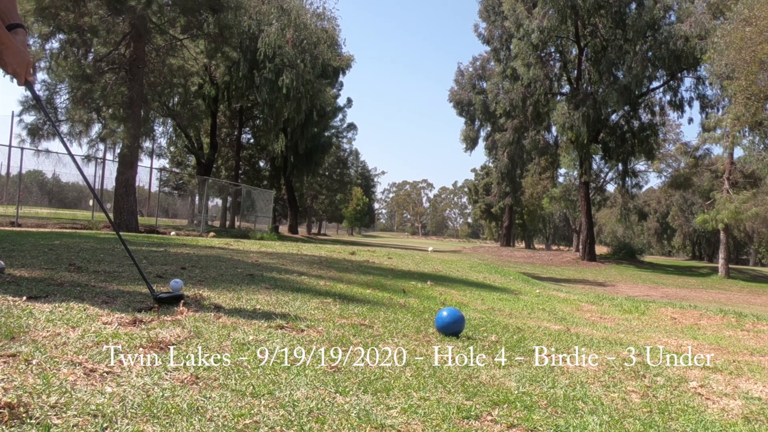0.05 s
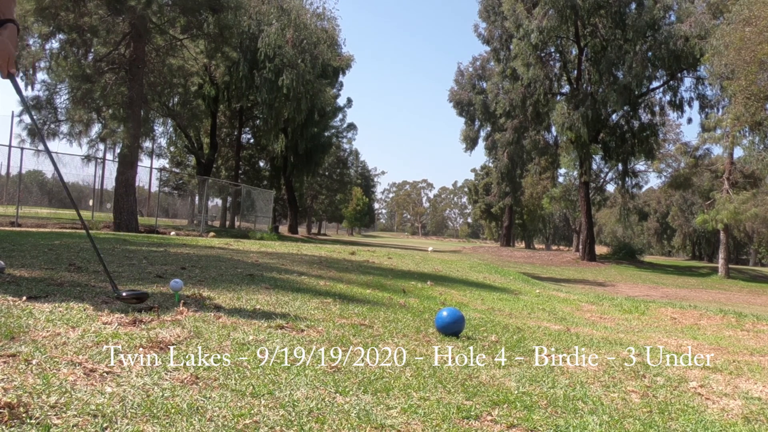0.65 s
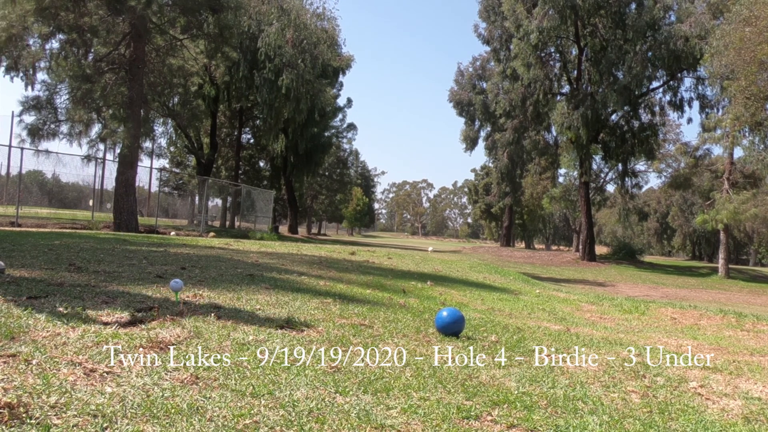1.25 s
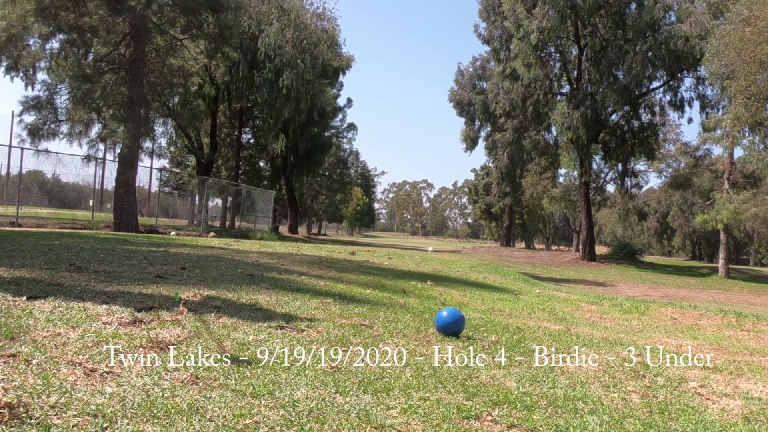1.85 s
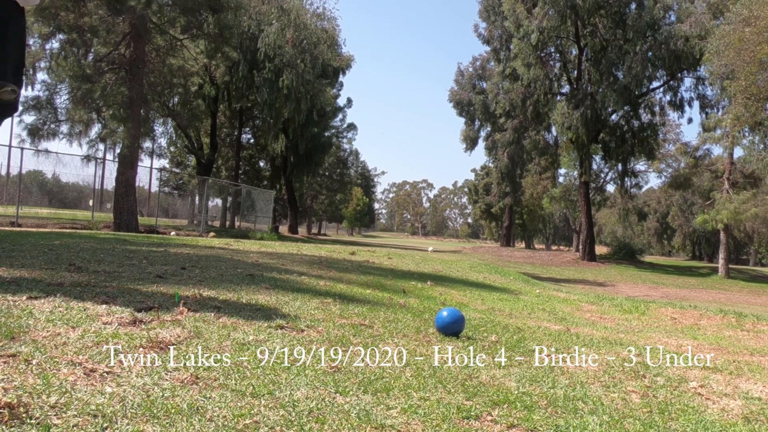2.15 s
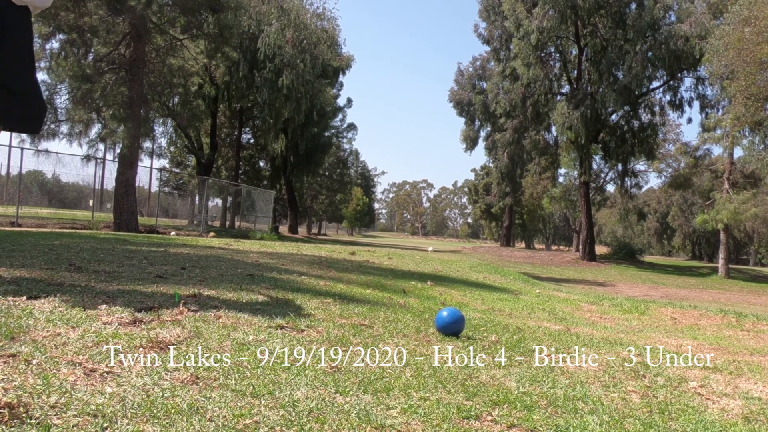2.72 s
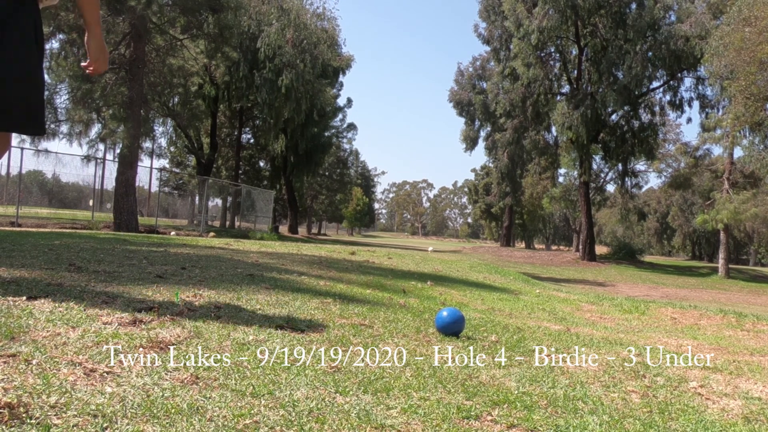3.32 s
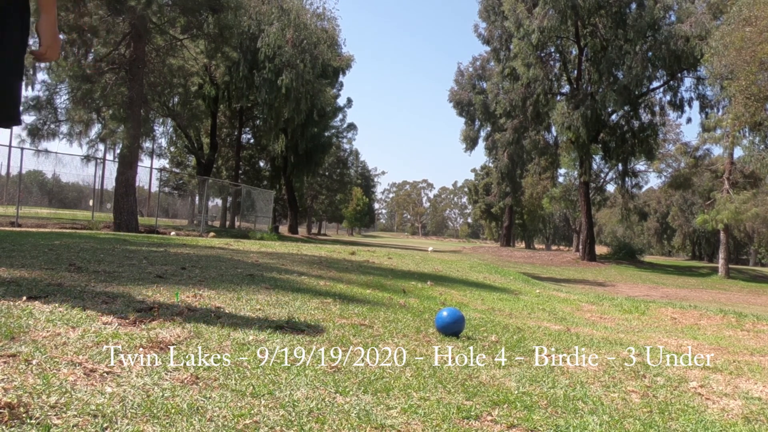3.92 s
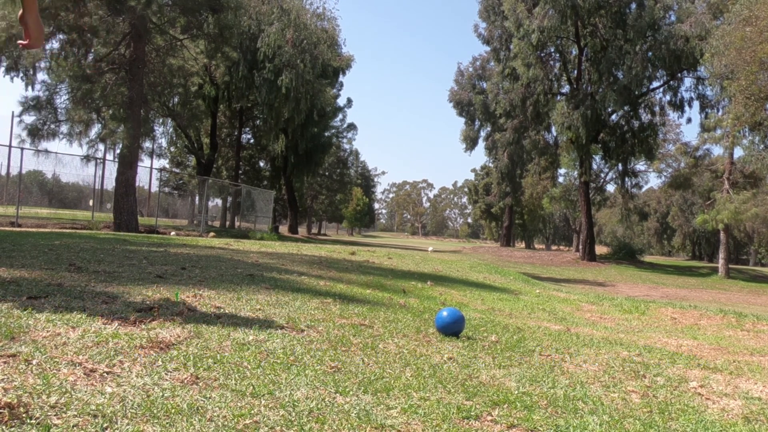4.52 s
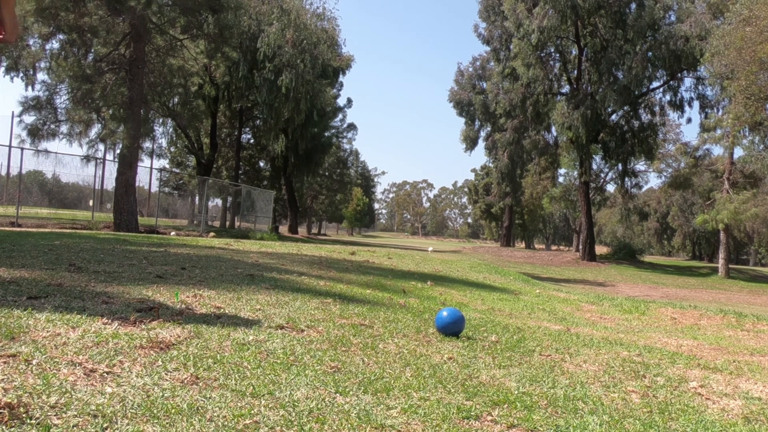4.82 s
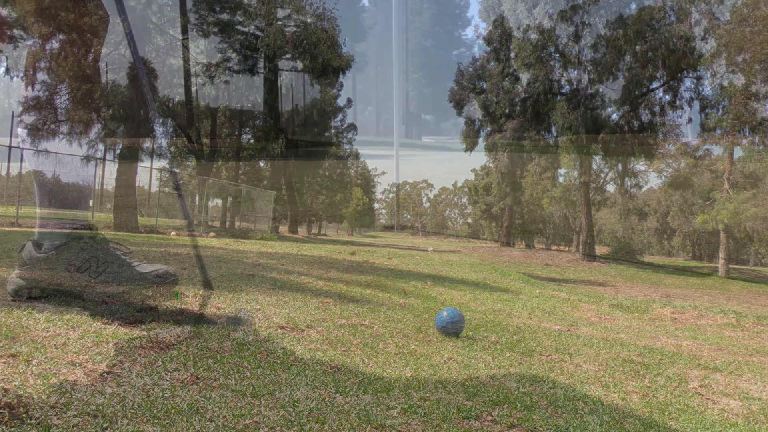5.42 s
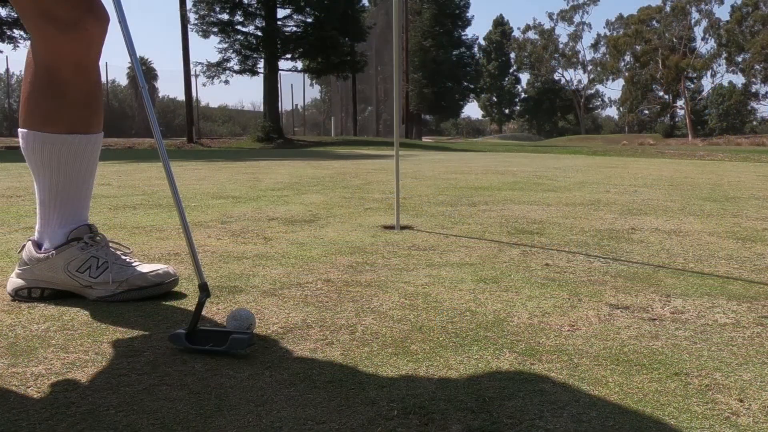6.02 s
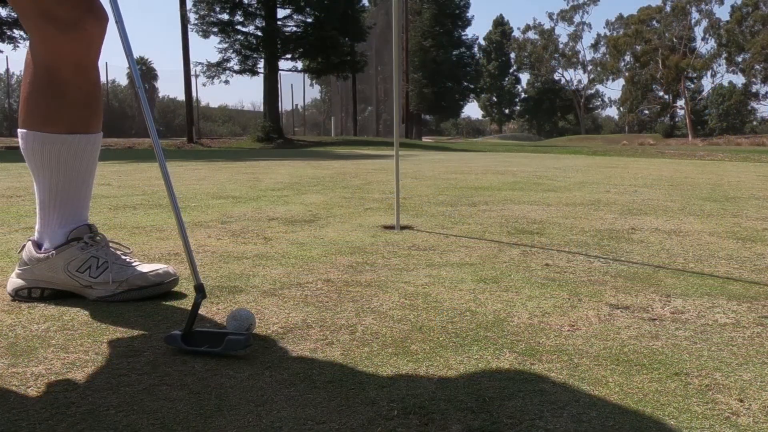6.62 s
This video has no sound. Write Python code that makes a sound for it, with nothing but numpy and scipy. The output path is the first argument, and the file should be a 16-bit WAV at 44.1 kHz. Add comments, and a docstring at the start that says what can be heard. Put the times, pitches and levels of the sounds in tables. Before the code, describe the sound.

Low wind rumble and short bird whistles surround a single loud, sharp golf drive that echoes briefly off the trees.

```python
"""Wind rumbles on the microphone and a small bird repeats two falling whistles and a buzz,
over the hiss of leaves and far traffic on a tree-lined golf course. A few steps away comes a drive:
the club swishes down, its hollow metal head cracks against the ball, and the trees throw the crack
back while a limiter ducks the level. The tee is in mono; at the end the scene changes to the
putting green, in stereo."""
import sys
import numpy as np
from scipy import signal
from scipy.fft import rfft, irfft
from scipy.io import wavfile
from scipy.ndimage import minimum_filter1d

SR = 44100
rng = np.random.default_rng(int(sys.argv[2]) if len(sys.argv) > 2 else 0)


def to_wav(s):
    """Save 16-bit WAV."""
    ch = np.atleast_2d(s).T  # columns
    pcm = np.round(np.clip(ch, -1, 1) * 32767)  # PCM
    wavfile.write(sys.argv[1], SR, pcm.astype(np.int16))


N = 294086
T = np.arange(N) / SR
FREQS = np.maximum(np.arange(N // 2 + 1) * SR / N, 1)
STRIKE_S = 1.7978
# the nearby ground bounces the crack and the birdsong back: delay_s, gain_db
GROUND_BOUNCES = [(.00166, -11.5), (.0042, -23.5)]


def crack(blow_db=20, push_db=-9, contact_s=.00006, push_low_hz=400):
    """The ball leaves with one short push of air and the hollow head rings."""
    # modes of club head and ball: pitch_hz, relative_db, t60_s
    head_modes = [(2680, -10, 0.0047), (3130, -12, .006), (3750, -20, 0.0087), (4167, -8, 0.01066),
                  (4420, -24.5, 0.027), (4630, -14.5, 0.01), (5050, -12.5, 0.01), (5520, -14.5, 0.011),
                  (5820, -13, .029), (5937, -25, .035), (6410, 0, 0.00723), (6230, -31, .05),
                  (6484, -26, 0.049), (6790, -36, .055), (7260, -23, .022), (7580, -25, .03),
                  (8000, -41.5, .0126), (8670, -42, .02), (9620, -44, .012), (10450, -33, 0.004),
                  (12713, -36, .012), (13650, -39, .008), (15600, -45, .0065)]
    blow = (np.arange(N) == round(STRIKE_S * SR)) * 1.
    ringing = sum((-1) ** k * from_db(db) * ring(blow, hz, t60)
                  for k, (hz, db, t60) in enumerate(head_modes))
    contact = signal.lfilter([1], [1, -np.exp(-1 / (contact_s * SR))], blow + 1e-18)
    push = butter(contact, push_low_hz, "high", order=1)
    return from_db(blow_db) * (from_db(push_db) * push + ringing)


def strike(turf_db=-22, turf_t60=0.02, lawn_db=-31, lawn_t60=0.049, grass_low_hz=3800,
           halo_db=-25, halo_t60=0.016, bark_t60=.035, air_hz=7500):
    """The crack bounces off the ground, scatters in turf and lawn, and slaps back from trunks."""
    # distinct echoes from single trunks: arrival_s, gain_db
    trunk_echoes = [(1.862, -53), (1.903, -60), (1.923, -56), (1.992, -57), (2.012, -64), (2.042, -62),
                    (2.15, -68.5)]
    direct = crack()
    treble = butter(direct, grass_low_hz, "high", order=5)  # grass blades scatter only short waves
    halo = from_db(halo_db) * scattered(direct, halo_t60)  # short broadband noise round the crack
    dulled = butter(treble, air_hz, "low", order=5)
    slaps = reflected(dulled, [(s - STRIKE_S, db) for s, db in trunk_echoes])
    trunks = scattered(slaps, bark_t60)
    turf = from_db(turf_db) * scattered(treble, turf_t60)
    lawn = from_db(lawn_db) * scattered(treble, lawn_t60)
    return direct + reflected(treble, GROUND_BOUNCES) + halo + turf + lawn + trunks


def swing():
    """Air rushes round the humming shaft; a bright hiss leads the crack and an airy whistle follows."""
    # swell of the downswing: time_s, level_db
    swish_curve = [(1.62, -86), (1.69, -72), (1.735, -49.5), (1.77, -48.5), (1.795, -44.5), (1.81, -58),
                   (1.86, -88.5)]
    # air round the club: freq_hz, level_db
    swish_colour = [(250, 3), (580, 3.5), (1100, 0), (2000, -5), (3500, -7), (5200, 6), (6700, 1),
                    (8000, -13.5), (10000, -28), (12000, -45.5)]
    # brief burst of hiss just before the crack: time_s, level_db
    hiss_curve = [(1.7855, -53.5), (1.787, -35), (1.790, -44), (1.795, -60)]
    # its bright colour: freq_hz, level_db
    hiss_colour = [(3500, -5), (5000, 0), (8000, -6.5), (10500, -15.5), (11500, -29)]
    # hum of the shaft, rising with its speed: time_s, pitch_hz, level_db
    shaft_glide = [(1.705, 410, -70), (1.73, 488, -58), (1.76, 547, -56), (1.797, 665, -48.5)]
    # rising airy whistle after the strike: time_s, pitch_hz, level_db
    follow_through_glide = [(1.80, 4150, -44), (1.826, 4170, -48), (1.845, 4300, -38), (1.86, 4420, -55),
                            (1.878, 4540, -39), (1.90, 4630, -38.5), (1.93, 4730, -58), (1.97, 4860, -66)]
    swish = envelope(swish_curve) * noise(swish_colour)
    pre_crack_hiss = envelope(hiss_curve) * noise(hiss_colour)
    hum = airy_tone(shaft_glide, spread_hz=25, speed_hz=150)
    follow_through = airy_tone(follow_through_glide, spread_hz=75, speed_hz=350)
    return swish + pre_crack_hiss + hum + follow_through


def tree_echoes(flutter_db=0.5, flutter_hz=70, top_db=-1.5, top_loss_db_per_s=11.5,
                sheen_db=-13, sheen_loss_db_per_s=80):
    """Foliage scatters the crack into overlapping washes, duller the farther they have come."""
    # groups of trees: arrival_s, rise_s, body_level_db, t60_s
    tree_groups = [(1.872, 0.014, -51.5, .28), (1.92, 0.028, -45.5, .66), (2.015, .0092, -44, 0.27),
                   (2.12, .06, -56.5, 1.34)]
    # body of the echo: freq_hz, level_db
    body_colour = [(3000, -17), (3750, -16), (4300, -6.5), (4660, 2), (5100, -2.5), (5500, -11.5),
                   (5900, -8.5)]
    # its bright top: freq_hz, level_db
    top_colour = [(5500, -17), (5820, -5), (6350, -5.5), (6600, 1), (7200, -12), (8100, -20), (10500, -45)]
    # its glassy sheen, which the air soon absorbs: freq_hz, level_db
    sheen_colour = [(8000, 2), (10500, -16), (13000, -15), (14000, -26)]
    power = 0
    for s, rise, db, t60 in tree_groups:
        swell = np.exp(-(np.minimum(T - s, 0) / rise) ** 2)
        fall_db = 60 * np.maximum(T - s, 0) / t60
        power = power + from_db(db - fall_db) ** 2 * swell
    travel_s = np.maximum(T - STRIKE_S, 0)
    top = from_db(top_db - top_loss_db_per_s * travel_s) * noise(top_colour)
    sheen = from_db(sheen_db - sheen_loss_db_per_s * travel_s) * noise(sheen_colour)
    flutter = from_db(flutter_db * wobble(flutter_hz))
    return np.sqrt(power) * flutter * (noise(body_colour) + top + sheen)


def birds(droop_share=0.21, tremble_hz=18, fray_hz=90, break_droop_share=0.15, break_rough_hz=70,
          slur_rough_share=0.29, waver_db=2.24, near_db=-11, near_t60=0.57, far_db=-12, far_t60=1.0):
    """Whistles droop ever faster and fray, then a buzz rasps; twigs and far trees scatter the song."""
    # pairs of pure whistles: start_s, length_s, top_hz, droop_power, peak_db, swell_db,
    # share_before_peak, fade_db
    whistles = [(0.087, 0.089, 6790, 2.9, -42.5, 33, 0.73, 6.5),
                (0.202, 0.081, 6250, 2.6, -43.5, 11, .6, 10),
                (2.576, 0.060, 6620, 2.14, -38.5, 25, 0.63, 7.5),
                (2.680, 0.069, 6110, 1.86, -45.5, 12, 0.14, 1),
                (4.584, 0.088, 6640, 6.5, -45.5, 28, 0.77, 1.5),
                (4.707, 0.063, 6310, 2.1, -44.5, 12.5, 0.69, 1.5)]
    # a second whistle can crack into falling partials: start_s, length_s, fundamental_hz, level_db
    breaks = [(2.738, 0.017, 1870, -62), (4.760, 0.025, 2000, -53)]
    # partials of that break: multiple, relative_db
    break_partials = [(2, 0), (3, 0), (4, -13)]
    # faint slurred chirps: start_s, length_s, first_hz, last_hz, level_db
    chirps = [(0.624, 0.025, 4750, 3860, -55.5), (0.698, 0.039, 4750, 3800, -60.5),
              (3.263, 0.038, 7690, 7130, -72.5), (3.985, 0.029, 7270, 6810, -71),
              (6.03, 0.11, 3230, 3150, -66)]
    song = np.zeros(N)

    def sing(s, hz, level, rough_hz):
        """Add one note, its pitch shaken by rough_hz."""
        at = int(s * SR)
        tremble = rough_hz * rms_one(butter(rng.standard_normal(SR), 600, "low"))[-len(hz):]
        song[at:at + len(hz)] += np.sqrt(2) * level * sine(hz + tremble)

    for s, length, top_hz, droop_power, peak_db, swell_db, peak_share, fade_db in whistles:
        progress = np.linspace(0, 1, int(length * SR))
        db = peak_db + np.interp(progress, [0, peak_share, 1], [-swell_db, 0, -fade_db])
        level = from_db(db) * signal.windows.tukey(len(progress), .2)
        droop = progress ** droop_power
        sing(s, top_hz * (1 - droop_share * droop), level, tremble_hz + fray_hz * droop)
    for s, length, hz, db in breaks:
        progress = np.linspace(0, 1, int(length * SR))
        for multiple, partial_db in break_partials:
            level = from_db(db + partial_db) * np.sin(np.pi * progress)
            sing(s, multiple * hz * (1 - break_droop_share * progress), level, break_rough_hz)
    for s, length, first_hz, last_hz, db in chirps:
        progress = np.linspace(0, 1, int(length * SR))
        fall_hz = first_hz - last_hz
        level = from_db(db) * np.sin(np.pi * progress)
        sing(s, first_hz - fall_hz * progress, level, slur_rough_share * fall_hz)
    song = song * from_db(waver_db * wobble(hz=120)) + buzzes()
    twigs = from_db(near_db) * scattered(song, near_t60)
    far_trees = from_db(far_db) * scattered(song, far_t60)
    return song + reflected(song, GROUND_BOUNCES) + twigs + far_trees


def buzzes(middle_hz=5240, low_db=-9, hiss_db=-4, throb_hz=130, throb_depth=0.2, shake_hz=450):
    """The bird's buzz is three rough tones over a little hiss; it opens quickly and stops short."""
    # one to end each phrase: start_s, length_s, level_db, rough_hz, low_hz, high_hz, high_relative_db
    buzz_notes = [(0.338, 0.098, -56, 150, 3350, 6350, -1), (2.826, 0.11, -54.5, 258, 3390, 6300, -5.5),
                  (4.834, 0.112, -53.5, 232, 3700, 6070, -13)]
    # hiss under the tones: freq_hz, level_db
    hiss_colour = [(2700, -8), (3350, 1), (3900, -3), (4500, -12), (5000, -1), (5900, 1), (6600, -1),
                   (7050, -22), (8000, -33)]
    hiss = from_db(hiss_db) * noise(hiss_colour)
    shakes = [wobble(shake_hz) for _ in range(3)]
    out = np.zeros(N)
    for s, length, db, rough_hz, low_hz, high_hz, high_db in buzz_notes:
        on = (T > s) & (T < s + length)
        voices = zip((low_hz, middle_hz, high_hz), (low_db, 0, high_db), shakes)
        tones = sum(from_db(tone_db) * sine(hz + rough_hz * shake[on]) for hz, tone_db, shake in voices)
        contour = np.interp((T[on] - s) / length, [0, .2, .6, .92, 1], [0.25, 0.77, 0.82, 0.91, 0])
        out[on] += from_db(db) * contour * (hiss[on] + np.sqrt(2) * tones)
    return out * (1 + throb_depth * np.sin(2 * np.pi * throb_hz * T))


def ticks(half_length_s=0.0011, skirt_db=-9):
    """Each tick is a brief bright burst of noise around its own pitch."""
    # small dry ticks: time_s, pitch_hz, level_db
    bursts = [(0.196, 5750, -48), (2.297, 4500, -46.5), (2.418, 5460, -62), (4.981, 5300, -53)]
    return sum(from_db(db) * np.exp(-((T - s) / half_length_s) ** 2)
               * noise([(0.74 * hz, skirt_db), (hz, 0), (1.2 * hz, skirt_db)]) for s, hz, db in bursts)


def rustle():
    """A short dry rustle in the grass."""
    # it trails the last tick: time_s, level_db
    rustle_curve = [(4.972, -69), (4.984, -59), (5.06, -64), (5.16, -82)]
    return envelope(rustle_curve) * noise([(3800, -7), (4900, 4), (6000, -9.0), (7000, -21)])


def wind(side_db=-9, rumble_boost_db=4.0, flutter_boost_db=2.5, lumpy_db=3.0, lumpy_hz=9,
         gust_rise_s=0.016, gust_hold_s=.016, gust_fall_s=.095):
    """Eddies on the microphone: the breeze rumbles in lumps and flutters; gusts add deep buffets."""
    # steady breeze, before the boosts: time_s, rumble_db, flutter_db, buffet_db
    breeze_curve = [(0.0, -49.5, -50.5, -67), (0.31, -60.5, -50.5, -73), (0.57, -51, -50, -65),
                    (1.0, -60.5, -49.5, -70), (1.36, -48, -51.5, -71), (2.13, -59.5, -53, -80),
                    (2.7, -58, -54.5, -63), (3.44, -52, -52, -69), (3.6, -54, -53.5, -71),
                    (4.12, -54.5, -51.5, -73), (4.5, -47, -51.5, -72), (4.81, -49.5, -51, -56),
                    (5.64, -54.5, -50.5, -56), (5.85, -52.5, -50, -63), (6.48, -43.5, -47.5, -52),
                    (6.67, -43.5, -50, -56)]
    # short gusts: start_s, rumble_db, buffet_db
    gusts = [(1.22, -46, -65), (1.70, -39, -54), (3.71, -38.5, -54), (4.605, -46, -44.5), (4.739, -33, -39),
             (4.872, -35, -44), (5.117, -36, -38.5), (5.219, -44.5, -43), (5.53, -42, -55),
             (5.88, -46, -54), (6.232, -37.5, -47.5), (6.405, -43, -48), (6.53, -37.5, -56)]
    # sub-bass buffet: freq_hz, level_db
    buffet_colour = [(16, -5.5), (30, -3.5), (42, -2.5)]
    # bass rumble: freq_hz, level_db
    rumble_colour = [(44, -3), (55, 1.5), (70, 0), (90, -0.5), (105, -4.5), (140, -16)]
    # low-mid flutter: freq_hz, level_db
    flutter_colour = [(75, -20.5), (105, -8.5), (140, 1), (180, -1), (230, -6.5), (300, -14.5), (400, -18),
                      (520, -31), (700, -41.5)]
    rumble_db, flutter_db, buffet_db = in_time(breeze_curve)
    lumps_db = lumpy_db * np.clip(wobble(lumpy_hz), -2, 2)
    corners = np.cumsum([0, gust_rise_s, gust_hold_s, gust_fall_s])
    gust_rumble, gust_buffet = sum(np.outer(from_db(levels_db), np.interp(T - s, corners, [0, 1, 1, 0]))
                                   for s, *levels_db in gusts)
    buffet = np.hypot(from_db(buffet_db + lumps_db), gust_buffet)
    rumble = np.hypot(from_db(rumble_db + rumble_boost_db + lumps_db), gust_rumble)
    flutter = from_db(flutter_db + flutter_boost_db)
    mid, side = (buffet * noise(buffet_colour) + rumble * noise(rumble_colour)
                 + flutter * noise(flutter_colour) for _ in range(2))
    return mid + from_db(side_db) * on_green() * np.array([side, -side])


def insects():
    """A thin, steady insect tone by the tee and a brief, insect-like far hiss."""
    # the hiss: time_s, level_db
    hiss_curve = [(4.25, -99), (4.38, -80), (4.52, -84), (4.65, -86)]
    # the tone: time_s, pitch_hz, level_db
    trill = [(0.0, 5900, -80), (2.2, 5874, -84.5), (4.0, 5910, -78), (6.04, 5880, -82.5)]
    hiss = envelope(hiss_curve) * noise([(7400, 1), (8000, 5), (9200, -13)])
    return hiss + airy_tone(trill, spread_hz=27, speed_hz=60)


def background(green_db=-52.0, shared_power=0.027):
    """Far traffic, leaves and insects at the tee; by the green, diffuse traffic lies to the right."""
    # slow drift of the bed at the tee: time_s, traffic_db, leaves_db
    bed_curve = [(0, -57, -63.5), (.35, -55.5, -62), (.9, -57, -63), (1.7, -56.5, -63.5), (2.6, -58.5, -66),
                 (3.5, -57, -65), (3.85, -56, -63), (4.6, -56.5, -63), (5.4, -57.5, -63), (6.0, -57, -63.5)]
    # far traffic: freq_hz, level_db
    traffic_colour = [(280, -35.5), (480, -7), (588, -5), (719, 0), (852, -1), (958, -4), (1110, 0),
                      (1540, 1.5), (1870, -0.5), (2400, -2.5), (3090, -8), (3600, -13), (4680, -40.5),
                      (7920, -120)]
    # hissing leaves: freq_hz, level_db
    leaves_colour = [(2500, -9.5), (3200, -9), (3960, -2.5), (4730, -2), (5070, -2.5), (5900, -9.5),
                     (6400, -15), (8070, -24), (10500, -32), (12000, -40)]
    # the bed by the green: freq_hz, level_db
    green_colour = [(310, -26), (520, -5.5), (852, -2), (955, -6.5), (1600, -3.5), (2530, -10), (2740, -11),
                    (3010, -12.5), (4760, -21), (5400, -21), (5990, -21.5), (6720, -23.5), (7530, -25),
                    (8070, -35.5), (10500, -40.5), (17800, -120)]
    # its stereo lean: freq_hz, left_minus_right_db
    green_lean = [(400, 0), (880, -4.5), (1500, -7.5), (2600, -7), (4450, -2.5), (7600, -1)]
    traffic_db, leaves_db = in_time(bed_curve)
    tee = insects() + from_db(traffic_db) * noise(traffic_colour)
    tee += from_db(leaves_db) * noise(leaves_colour)
    centre = np.sqrt(shared_power) * noise(green_colour)
    channels = [shaped(centre + noise(green_colour), sign * over_hz(green_lean) / 2) for sign in (1, -1)]
    green = from_db(green_db) * rms_one(np.array(channels))
    fade_angle = np.pi / 2 * on_green()
    return np.cos(fade_angle) * tee + np.sin(fade_angle) * green


def on_green(change_s=6.04, fade_s=0.011):
    """Share of the green in the sound, rising from 0 to 1 in a brief crossfade."""
    return np.clip((T - change_s) / fade_s + .5, 0, 1)


def from_db(db):
    """Decibels to gain."""
    return 10 ** (np.asarray(db) / 20)


def rms_one(x):
    """Scale to unit power."""
    return x / np.sqrt(np.mean(x ** 2) + 1e-20)


def in_time(rows):
    """Each column of a curve at every sample."""
    s, *columns = np.transpose(rows)
    return [np.interp(T, s, c) for c in columns]


def envelope(rows):
    """Gain of a level curve that is silent outside its span."""
    return from_db(in_time(rows)[0]) * (T > rows[0][0]) * (T < rows[-1][0])


def over_hz(points):
    """Join points by straight lines in log frequency."""
    hz, value = np.transpose(points)
    return np.interp(np.log(FREQS), np.log(hz), value)


def shaped(x, db):
    """Give a sound a gain in dB at every frequency."""
    return irfft(rfft(x) * from_db(db), N)


def noise(colour, edge_db=60):
    """Noise of a given colour, falling by edge_db an octave beyond its ends; rms 1."""
    octaves_outside = np.abs(np.log2(FREQS / np.clip(FREQS, colour[0][0], colour[-1][0])))
    return rms_one(shaped(rng.standard_normal(N), over_hz(colour) - edge_db * octaves_outside))


def butter(x, hz, kind, order=2):
    """Causal low-pass or high-pass."""
    return signal.sosfilt(signal.butter(order, hz, kind, fs=SR, output="sos"), x + 1e-18)


def wobble(hz):
    """Random movement up to a given speed; spread 1."""
    return rms_one(butter(rng.standard_normal(N), hz, "low"))


def sine(hz):
    """A sine that follows a pitch curve."""
    return np.sin(2 * np.pi * np.cumsum(hz) / SR)


def airy_tone(rows, spread_hz, speed_hz):
    """A gliding tone that turbulence shakes in pitch, silent outside its span."""
    hz, db = in_time(rows)
    return from_db(db) * sine(hz + spread_hz * wobble(speed_hz)) * (T > rows[0][0]) * (T < rows[-1][0])


def ring(force, hz, t60):
    """A unit click sets a sine of height 1 ringing."""
    r, w = from_db(-60 / (t60 * SR)), 2 * np.pi * hz / SR
    return signal.lfilter([0, np.sin(w)], [1, -2 * r * np.cos(w), r * r], force + 1e-18)


def reflected(x, rows):
    """Late, weaker copies of a sound, from rows of delay_s, gain_db."""
    return sum(from_db(db) * np.interp(T - delay, T, x, left=0) for delay, db in rows)


def scattered(x, t60):
    """A dense cloud of reflections that dies away, with the power of its source."""
    cloud = rng.standard_normal(SR) * from_db(-60 * T[:SR] / t60)
    return signal.fftconvolve(x, cloud / np.linalg.norm(cloud))[:N]


def released(over_db, db_per_s):
    """Gain reduction that jumps up at once and lets go at a steady rate."""
    return np.maximum.accumulate(over_db + db_per_s * T) - db_per_s * T


def scene():
    """The shot and the birds are central, over wind and background."""
    return wind() + background() + swing() + strike() + tree_echoes() + ticks() + rustle() + birds()


def record(dry, threshold_db=1.2, fast_db_per_s=105, slow_share=0.32, slow_db_per_s=10.5,
           split_hz=240, cutoff_hz=16500):
    """A limiter ducks all but the bass and lets go fast, then slowly; peaks clip and the top is cut."""
    over_db = np.maximum(20 * np.log10(np.abs(dry).max(axis=0) + 1e-9) - threshold_db, 0)
    over_db = -minimum_filter1d(-over_db, size=45)  # the limiter looks half a millisecond ahead
    duck_db = np.maximum(released(over_db, fast_db_per_s), released(slow_share * over_db, slow_db_per_s))
    gain = from_db(-duck_db)
    bass = butter(dry * from_db(-over_db), split_hz, "low")  # held down only during the peak itself
    clipped = np.clip(dry * gain + bass * (1 - gain), -1, 1)
    return butter(clipped, cutoff_hz, "low", order=10)


dry = scene()
out = record(dry)
to_wav(out)
```